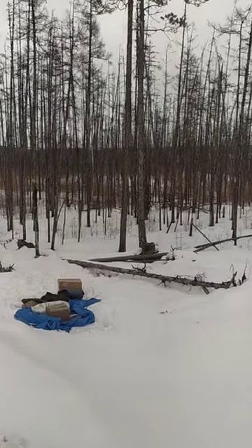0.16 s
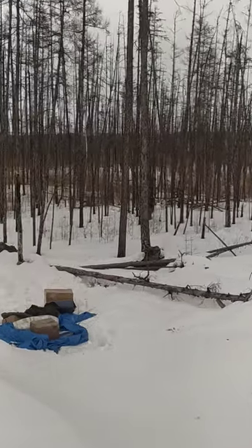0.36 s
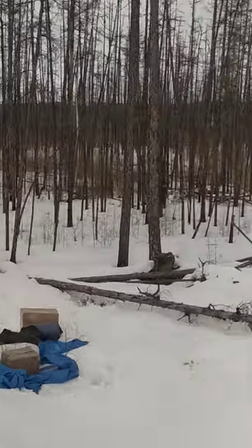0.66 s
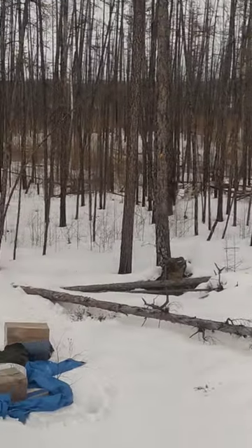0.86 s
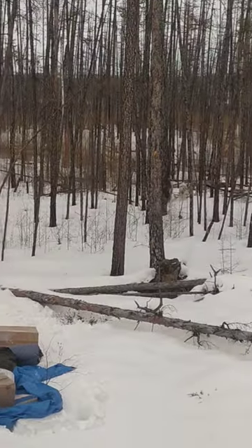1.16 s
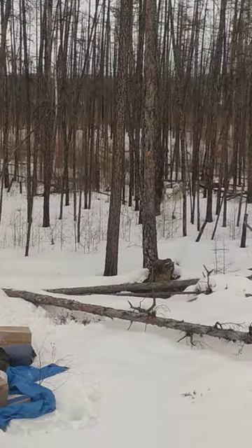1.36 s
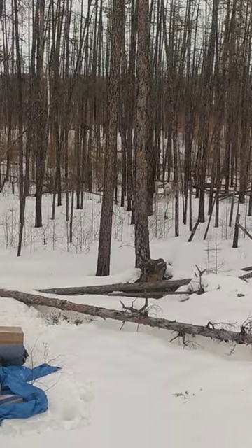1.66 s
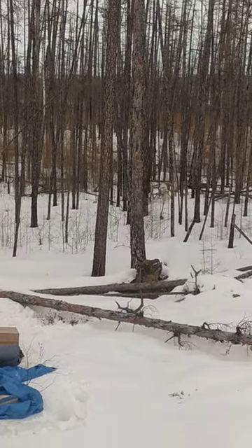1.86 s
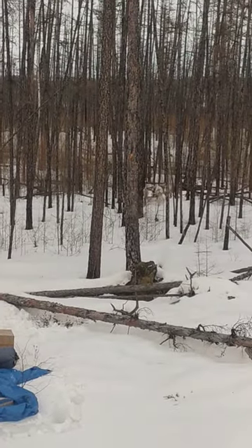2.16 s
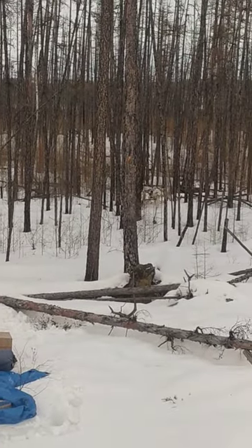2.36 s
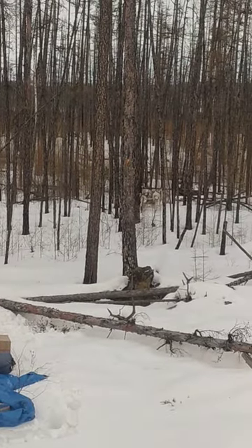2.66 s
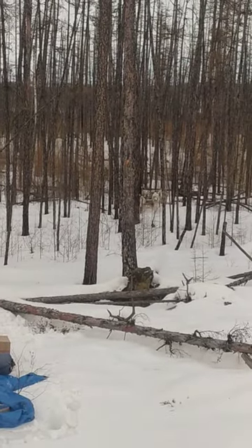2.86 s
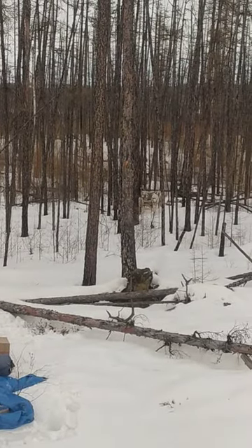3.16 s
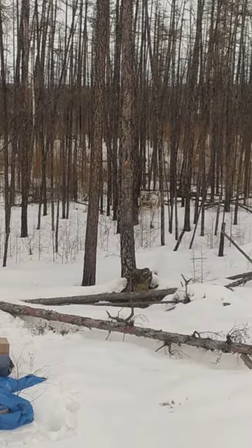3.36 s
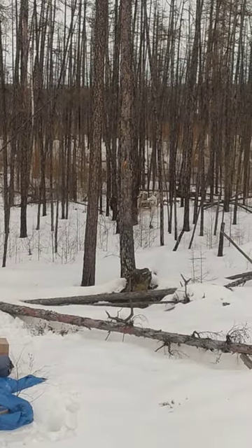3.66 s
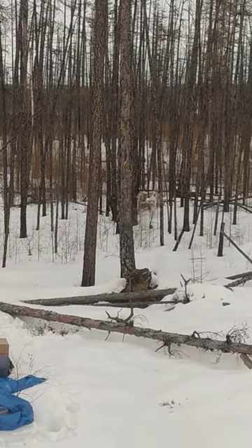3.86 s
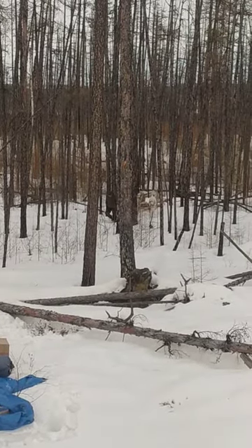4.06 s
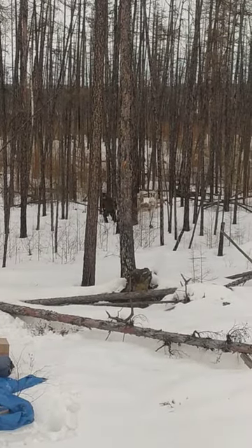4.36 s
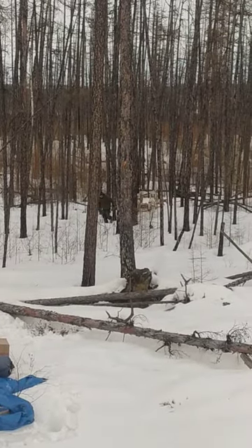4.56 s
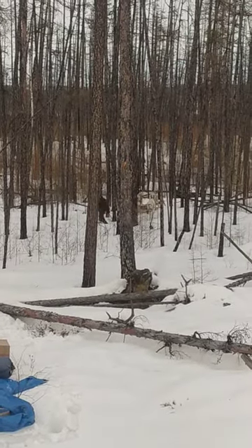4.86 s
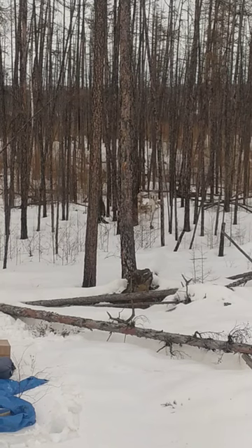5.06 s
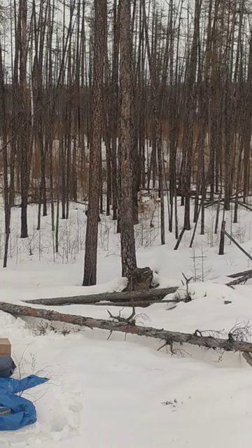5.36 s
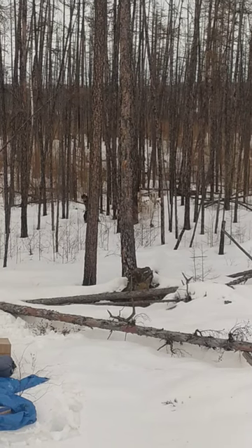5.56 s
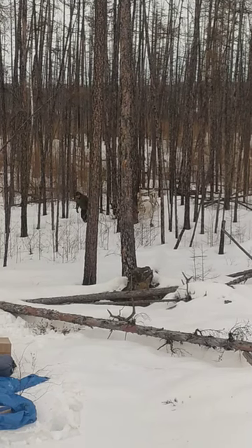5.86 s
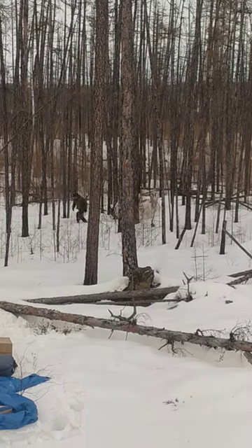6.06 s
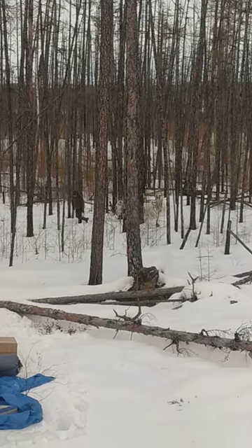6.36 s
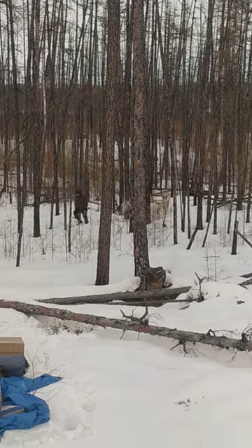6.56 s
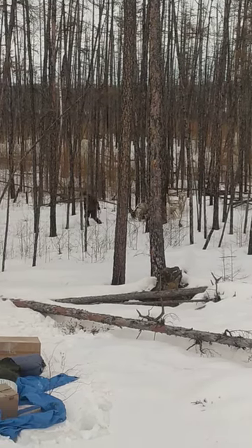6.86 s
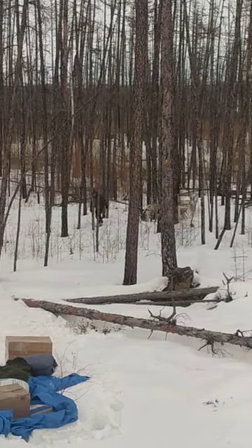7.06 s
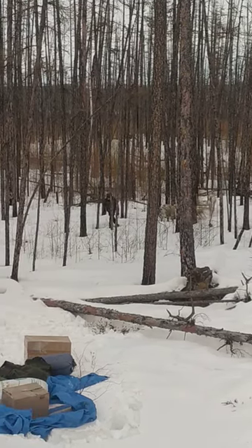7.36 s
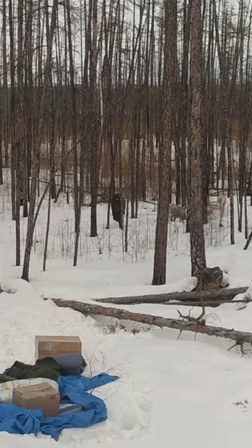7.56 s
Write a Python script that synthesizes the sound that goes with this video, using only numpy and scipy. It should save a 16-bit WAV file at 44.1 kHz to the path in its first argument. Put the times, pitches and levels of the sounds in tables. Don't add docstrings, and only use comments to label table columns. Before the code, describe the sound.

Strong winter wind buffets a hand-held camera's microphone in a snowy forest, low thumping rumble with gusts, faint whistling and thin snow hiss.

```python
import sys
import numpy as np
from scipy import signal
from scipy.fft import rfft, irfft, next_fast_len
from scipy.io import wavfile
from scipy.ndimage import uniform_filter1d, map_coordinates

SR = 44100
rng = np.random.default_rng(int(sys.argv[2]) if len(sys.argv) > 2 else 0)


def level_to_linear(level):
    exponent = np.asarray(level, float) / 20
    return 10 ** exponent


def wrap_up_sound(samples):
    columns = np.atleast_2d(samples).T
    tamed = np.clip(columns, -1, 1)
    steps = np.round(tamed * 32767).astype(np.int16)
    wavfile.write(sys.argv[1], SR, steps)


N = 339261


def unit(x):
    return x / np.sqrt(np.mean(np.abs(x) ** 2) + 1e-20)


def curves(rows):
    t_s, *columns = np.transpose(rows)
    return [np.interp(np.arange(N) / SR, t_s, column) for column in columns]


def wobble(rate_hz):
    knots = rng.standard_normal(int(N * rate_hz / SR) + 4)
    return map_coordinates(knots, [np.arange(N) * rate_hz / SR])


def bumps(rows, length_s):
    margin = SR // 4
    out, t = np.zeros(N + SR), np.arange(-margin, margin) / SR
    for s, height in rows:
        out[round(s * SR):][:len(t)] += height * np.exp(-(t / length_s) ** 2)
    return out[margin:margin + N]


def sides(lean_db):
    return level_to_linear(np.array([lean_db / 2, -lean_db / 2]))


def pair(alike, patchy_db):
    z = signal.stft(rng.standard_normal((2, N + 1024)), nperseg=512)[2]
    field = uniform_filter1d(rng.standard_normal(z.shape[1:]), size=8, axis=0)
    field = uniform_filter1d(field, size=12, axis=1)
    a, b = signal.istft(z * level_to_linear(patchy_db * unit(field)), nperseg=512)[1][:, :N]
    turn = np.arccos(np.clip(alike, 0, 1)) / 2
    common, differing = np.cos(turn) * a, np.sin(turn) * b
    return np.array([common + differing, common - differing])


def coloured(x, spectrum):
    m = next_fast_len(N)
    hz, db = np.transpose(spectrum)
    log_f = np.log(np.fft.rfftfreq(m, 1 / SR) + 1)
    gain = level_to_linear(np.interp(log_f, np.log(hz + 1), db, -120, -120))
    return unit(irfft(rfft(x, m) * gain, m)[..., :N])


def moving_band(hz, width_hz, below=1, above=1):
    f, t, z = signal.stft(rng.standard_normal(N + 4096), SR, nperseg=4096)
    at = np.minimum((t * SR).astype(int), N - 1)
    off = (f[:, None] - hz[at]) / (width_hz * np.ones(N))[at]
    bell = (1 + (2 * off) ** 2) ** -np.where(off > 0, above, below)
    level = np.linalg.norm(bell, axis=0)
    return unit(signal.istft(z * bell / level, SR, nperseg=4096)[1][:N])


# f/Hz, level/dB [per Hz]
PREAMP_LEFT = [(1500, 0), (3000, -2), (6000, -8), (9000, -8.5), (12000, -10.5), (14000, -8), (15000, -13),
               (17000, -32)]
PREAMP_RIGHT = [(1500, -26), (3000, 2), (6000, -3.5), (9000, -1.5), (12000, 0), (14700, 0), (15450, -9),
                (17000, -30)]


def preamp_hiss():
    left, right = pair(alike=0.061, patchy_db=1.7)
    return level_to_linear(-60.5) * np.array([coloured(left, PREAMP_LEFT), coloured(right, PREAMP_RIGHT)])


# t/s, density/dB, fineness/dB [high over low hiss]
SNOW = [(0.05, -16, -1), (0.45, -15, 0), (0.7, -9, 2), (1.09, -10, -3), (1.2, -8, 1.5), (2.05, -5, -2),
        (2.31, -5, -2), (2.78, -2.5, -1.5), (4.7, -4.5, 1), (5.59, -2, 0), (5.92, -0.5, -0.5),
        (6.22, 1.5, 0), (6.6, 1.5, 0), (6.74, 5.5, -2), (6.92, 4, -0.5), (7.15, -0.5, 1), (7.28, 1.5, 1.5),
        (7.64, -1.5, 1.5)]
# t/s, level/dB
FLURRIES = [(0.78, -76), (1.6, -75), (2.32, -70), (2.72, -72), (2.86, -72), (3.2, -75), (3.65, -74),
            (5.119, -75), (5.5, -75), (5.86, -64), (5.93, -72), (6.2, -70), (6.42, -72), (6.73, -66),
            (6.86, -64), (7.25, -72)]
# f/Hz, level/dB [per Hz]
SNOW_LOW = [(1500, -33), (2500, -2.5), (4000, -3.5), (5800, 0), (7200, -4), (8500, -25)]
SNOW_HIGH = [(6500, -21), (7500, -1.5), (9500, -2), (11000, -4), (11600, -8), (15000, -16), (17000, -27)]
SPRAY = [(2000, -20), (3500, -3), (7000, -1), (11000, -1), (14000, -1), (15500, -10), (17000, -30)]


def blown_snow(snow_db):
    fine_db = curves(SNOW)[1]
    flurry_db = 0.59 * wobble(9)
    sift_db = 1.14 * snow_db - 60.5 + flurry_db
    fizz_db = 1.48 * (snow_db + fine_db) - 60.5 + flurry_db
    sift = level_to_linear(sift_db) * coloured(pair(alike=0.36, patchy_db=1.0), SNOW_LOW)
    fizz = level_to_linear(fizz_db) * coloured(pair(alike=0.28, patchy_db=1.5), SNOW_HIGH)
    strikes = bumps([(s, level_to_linear(db)) for s, db in FLURRIES], length_s=0.049)
    return sift + fizz + strikes * coloured(pair(alike=0.5, patchy_db=2.0), SPRAY)


# f/Hz, level/dB [per Hz]
RUSH = [(350, -13.5), (600, 1), (800, -5.5), (1100, -11), (1500, -18), (2200, -24.5), (3200, -36),
        (4500, -56), (6000, -47)]


def rush(gust_db, snow_db):
    level_db = -43.5 + 0.84 * gust_db + 0.23 * snow_db + 0.14 * wobble(11.0)
    noise = coloured(pair(alike=0.3, patchy_db=1.15), RUSH)
    return level_to_linear(level_db) * sides(1.5)[:, None] * noise


# t/s, tone/Hz
EDGE = [(0, 495), (0.3, 510.5), (1, 520), (1.5, 547), (1.85, 539.7), (2.1, 491), (2.3, 453), (2.6, 465),
        (2.9, 432.2), (3.8, 426), (4.3, 445), (4.65, 483.8), (5.25, 524), (5.65, 486), (6.35, 528),
        (6.9, 482.7), (7.3, 478), (7.69, 471)]


def sine(hz):
    return np.sqrt(2) * np.sin(2 * np.pi * np.cumsum(hz) / SR)


def right_edge():
    hz, = curves(EDGE)
    above_mid_hz = hz - 440
    low_db = -43.5 + 0.0364 * above_mid_hz + 0.92 * wobble(2.78) + 2.4 * wobble(14)
    high_db = -52.5 + 0.05 * above_mid_hz + 2.4 * wobble(12)
    low = level_to_linear(low_db) * sine(hz + 8 * wobble(25))
    high = level_to_linear(high_db) * sine(1.228 * hz + 12 * wobble(25))
    return low + high


# t/s, lip whistle/Hz, cavity hum/Hz
FLOW = [(0, 1167, 474), (1, 1347, 394), (1.7, 1465, 456), (2.4, 1560, 398), (3.2, 1690, 426),
        (3.8, 1780, 414), (4.6, 1674, 463), (5.2, 1605, 471), (6, 1490, 439), (7, 1354, 474),
        (7.69, 1270, 434)]
# t/s, gain/dB
FLARES = [(0.09, 1.3), (0.19, -0.5), (0.39, 3.5), (0.62, 1.9), (1.01, 1), (1.11, 2.5), (1.71, 3), (1.93, 4),
          (2.12, 4), (2.72, 4), (3.52, 3), (3.9, 2.5), (4.19, 0), (4.32, 1), (4.94, 1), (5.24, 2),
          (5.51, 2), (5.74, 2), (6.09, 3.5), (6.64, 1.8), (7.05, 3), (7.2, -0.5), (7.3, 3)]


def left_port(gust_db):
    whistle_hz, hum_hz = curves(FLOW)
    hum_db = -34 + 0.15 * gust_db + 1.8 * wobble(5.6)
    hum = level_to_linear(hum_db) * moving_band(hum_hz, 113, below=0.81, above=1.72)
    flare_db = bumps(FLARES, length_s=0.06)
    breath = moving_band(whistle_hz, 0.45 * whistle_hz, below=0.91, above=1.84)
    flicker_db = 1.8 * wobble(9) + 0.8 * flare_db - 7
    flicker = level_to_linear(flicker_db) * moving_band(0.97 * whistle_hz + 70 * wobble(8), 150)
    octave_down = level_to_linear(-7.0) * moving_band(whistle_hz / 2, 310)
    whistle_db = -47 + 0.15 * gust_db + 0.6 * flare_db - 1.54
    return hum + level_to_linear(whistle_db) * (breath + flicker + octave_down)


# f/Hz, level/dB [per Hz]
BUFFET = [(15, -46), (30, -15), (45, 1), (60, 1.5), (80, -6), (110, -17), (150, -68)]
ROAR_LEFT = [(50, -12), (90, -2), (130, -7), (200, -2.5), (300, -12.5), (450, -10.5), (560, -17),
             (800, -64)]
ROAR_RIGHT = [(50, -48), (90, 0), (130, 0.5), (200, -6), (330, -4.5), (450, -8), (560, -13.5), (800, -38)]


def turbulence(gust_db, lean_db):
    buffet_db = -32 + 1.25 * gust_db + 0.36 * wobble(3.9)
    buffet = level_to_linear(buffet_db) * sides(lean_db - 1.0) * coloured(pair(alike=0.78, patchy_db=0.5), BUFFET)
    left, right = pair(alike=0.43, patchy_db=0.08)
    roar = np.array([level_to_linear(-0.5) * coloured(left, ROAR_LEFT), level_to_linear(2.0) * coloured(right, ROAR_RIGHT)])
    roar_db = -30 + 0.89 * gust_db + 0.63 * wobble(10)
    return buffet + level_to_linear(roar_db) * sides(0.77 * lean_db) * roar


def swirls(gust_db):
    hz = np.full(N, 112)
    shared, own = moving_band(hz, 110), moving_band(hz, 90)
    return level_to_linear(-39 + 2.88 * gust_db) * np.array([shared + 0.5 * own, shared - 0.5 * own])


# t/s, peak/dB, left-right/dB, length/s
EDDIES = [(0.161, -15, 0, 0.027), (0.274, -15, 0, 0.029), (1.228, -20.5, -12, 0.07),
          (1.345, -11.5, 0, 0.015), (1.568, -8.5, -1, 0.016), (1.626, -12, -6, 0.055),
          (1.704, -0.5, -6, 0.038), (1.803, -8, -12, 0.055), (1.908, -13, -10, 0.032),
          (2.008, -9.5, -8, 0.025), (2.35, -17, -5, 0.051), (2.588, -17.5, -14, 0.045),
          (3.361, -20.5, -16, 0.05), (3.553, -22, -16, 0.069), (3.663, -8.5, -7.5, 0.036),
          (3.932, -11.5, -9, 0.04), (4.209, -16, -7, 0.039), (4.302, -10, -11, 0.027),
          (4.874, -12.5, -7, 0.024), (5.022, -12, -3, 0.033), (5.746, -9, -15, 0.032),
          (5.886, -14, -4, 0.024), (6.099, -12.5, -9, 0.028), (6.361, -22, -1, 0.058),
          (6.745, -10, 3, 0.03), (6.819, -12.5, -5, 0.045), (6.904, -8.5, -1, 0.027),
          (6.994, -13, 1, 0.027), (7.407, -13, -3, 0.045), (7.596, -16.5, -3, 0.038)]
# t/s, peak/dB, left-right/dB, throb/Hz
SMALL_EDDIES = [(0.039, -17, -2.0, 59.3), (0.397, -27, -17, 66.7), (0.463, -23, -15, 62.0),
                (0.585, -18, -8, 61.0), (0.822, -21, 9, 61.0), (1.049, -19.0, -6, 64.0),
                (1.388, -15.5, -10, 65.0), (2.154, -19, -3, 66.0), (2.225, -20.0, -4, 60.0),
                (2.272, -18.0, -6.0, 71.0), (2.632, -13.5, -5.0, 60.0), (2.73, -15.5, -8.0, 65.6),
                (2.797, -24, -13, 61.0), (2.911, -16, -3, 74.7), (2.96, -22, -1.0, 60.0),
                (3.018, -21, -12.0, 61.0), (3.199, -19, 0.0, 74.0), (3.312, -18, -15, 56.7),
                (3.508, -14.5, -5, 57.3), (3.848, -19, -6.0, 57.0), (4.007, -14.5, -9, 63.5),
                (4.074, -19, -9, 68.0), (4.154, -22, 1.0, 68.9), (4.371, -21, -3, 61.9),
                (4.499, -14.5, -3, 67.0), (4.567, -19, -8, 59.1), (4.648, -18, -7, 65.0),
                (4.74, -15.5, -5, 71.0), (5.179, -18.0, 3, 57.0), (5.259, -23, -13, 69.0),
                (5.304, -22, 4, 57.0), (5.45, -17.0, -1.0, 72.0), (5.493, -16.5, -10, 72.0),
                (5.558, -23, -4.0, 68.6), (5.624, -18, -1, 54.0), (5.831, -17, 4, 76.2),
                (5.969, -10.5, -2.0, 59.0), (6.292, -16.0, -9, 59.0), (6.394, -18, 0.0, 62.0),
                (6.517, -10.5, -2.0, 61), (6.586, -19, 4, 66.4), (6.671, -13.0, -1.0, 60.0),
                (7.104, -13.5, -6, 72.0), (7.2, -11, -1.0, 59.5), (7.299, -10, 0.0, 62.6),
                (7.347, -18, -10, 53.0), (7.517, -14.0, 2, 62.2), (7.562, -14, 3.0, 68.0)]
# t/s, peak/dB, left-right/dB, throb/Hz
QUICK_EDDIES = [(1.2, -28, -3, 110), (2.229, -23.5, -2, 140), (2.699, -22.5, -2, 134), (2.98, -24, -4, 150),
                (3.479, -20, -5, 129.5), (3.84, -28, 2, 124), (4.089, -20, -9, 145), (4.17, -21, -2, 115),
                (4.82, -19, -2, 135), (4.92, -20, 0, 133), (5.45, -21, 0, 139), (6.15, -20, -2, 161)]


def eddies(gust_db):
    margin, small_s = SR // 4, 0.022
    out, t = np.zeros((2, N + SR)), np.arange(-margin, margin) / SR
    rows = []
    for s, db, lean_db, length_s in EDDIES:
        throb_hz = 56.2 + 2.5 * gust_db[round(s * SR)]
        rows.append((s, db, lean_db, length_s, throb_hz))
    for s, db, lean_db, throb_hz in SMALL_EDDIES + QUICK_EDDIES:
        rows.append((s, db, lean_db, small_s, throb_hz))
    for s, db, lean_db, length_s, throb_hz in rows:
        start, skew = rng.random(2)
        swell = level_to_linear(db - 4.0 - 18.0 * np.abs(t / length_s) ** 2.25)
        port_lag = 0.8 * (skew - 0.5) * np.array([[1], [-1]])
        phase = 2 * np.pi * (throb_hz * t + start / 2) + port_lag
        out[:, round(s * SR):][:, :len(t)] += sides(lean_db)[:, None] * swell * np.cos(phase)
    return out[:, margin:margin + N]


# t/s, gust/dB, left-right/dB
WIND = [(0, 1.5, -2.5), (0.5, -0.5, -8), (0.85, 0, -3.5), (1.1, 0, -4.5), (1.55, 2, -5), (1.9, 0.5, -6),
        (2.5, 0, -2), (2.9, 0.5, -6.5), (3.3, 0.5, -1.5), (3.7, 1, -1), (4.3, 0, -3), (4.7, 0.5, -6.5),
        (5.5, 1, -3), (6.15, 2, -4), (6.55, 4.5, 1), (6.88, 4.5, 2.5), (7.3, 3.5, 1), (7.69, 4, -1)]


def scene():
    gust_db, lean_db = curves(WIND)
    snow_db = curves(SNOW)[0]
    air = blown_snow(snow_db) + rush(gust_db, snow_db)
    tones = np.array([left_port(gust_db), right_edge()])
    return air + tones + turbulence(gust_db, lean_db) + swirls(gust_db) + eddies(gust_db)


def band_limit(x):
    return signal.sosfilt(signal.butter(12, 15490, fs=SR, output="sos"), x)


def record(dry):
    return band_limit(dry + preamp_hiss())


dry = scene()
out = record(dry)
wrap_up_sound(out)
```